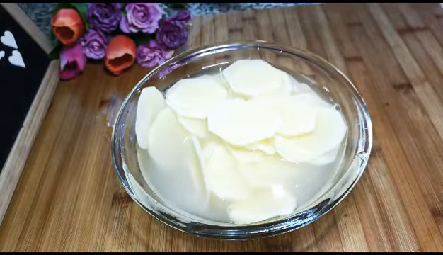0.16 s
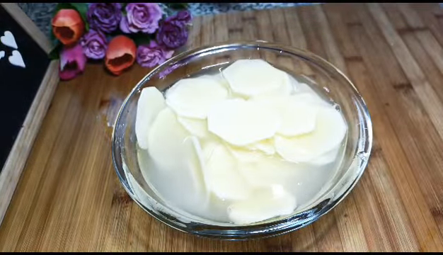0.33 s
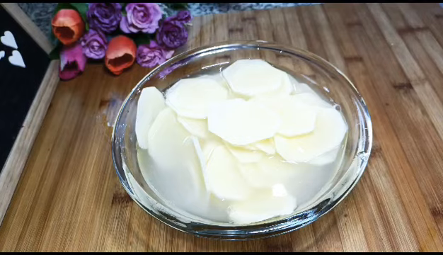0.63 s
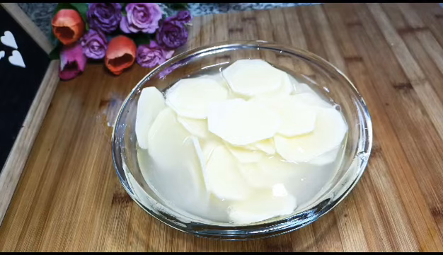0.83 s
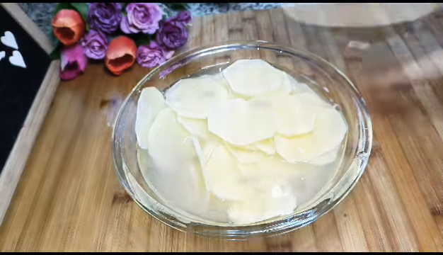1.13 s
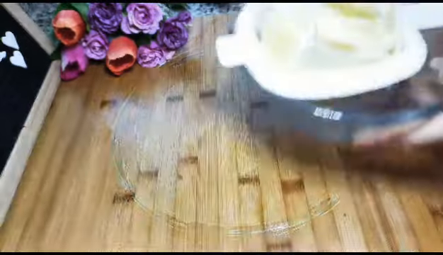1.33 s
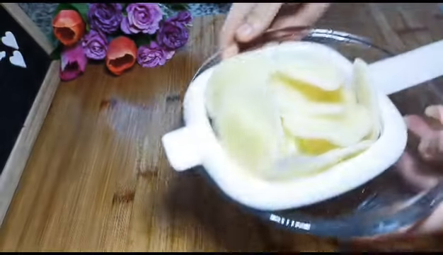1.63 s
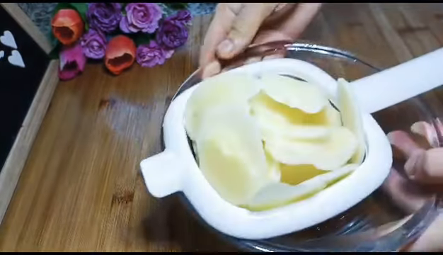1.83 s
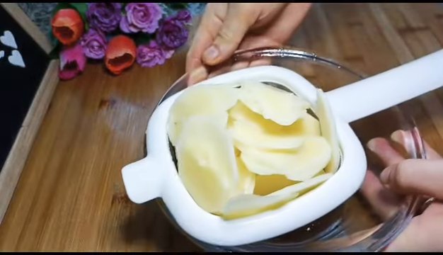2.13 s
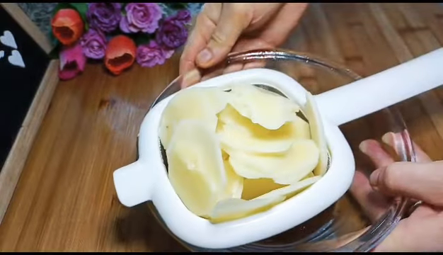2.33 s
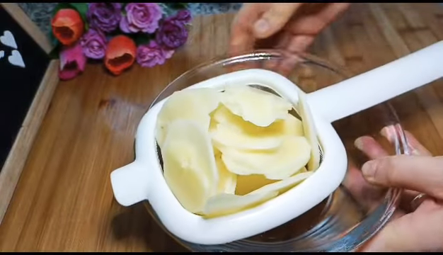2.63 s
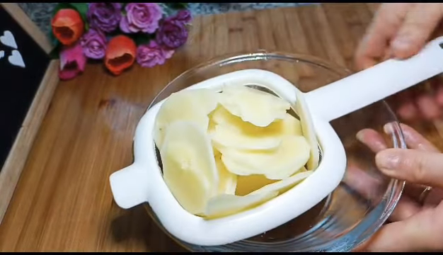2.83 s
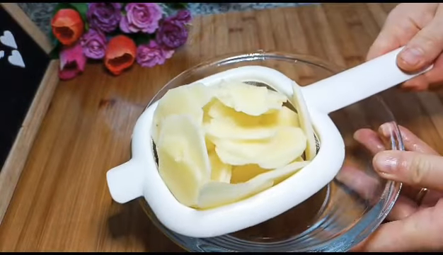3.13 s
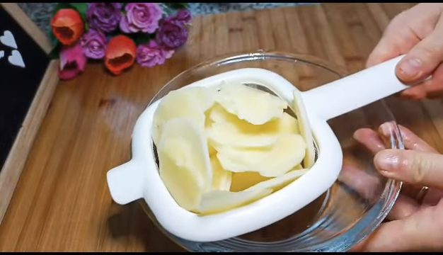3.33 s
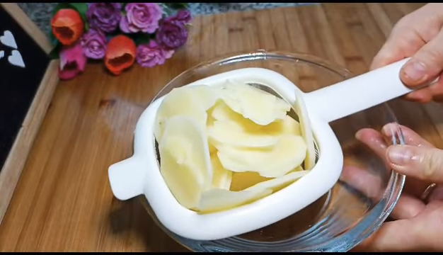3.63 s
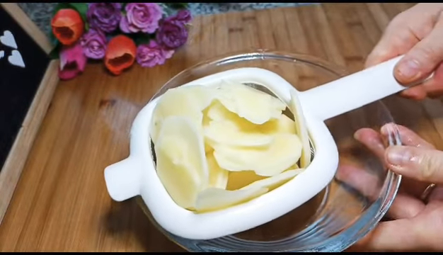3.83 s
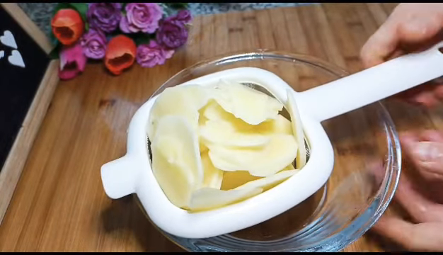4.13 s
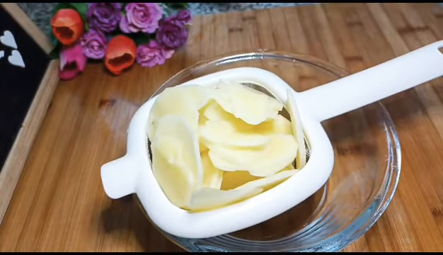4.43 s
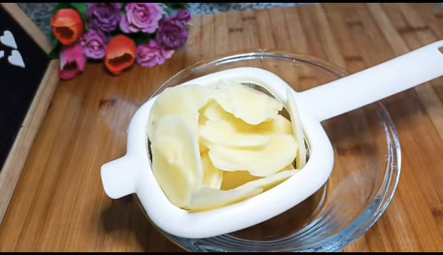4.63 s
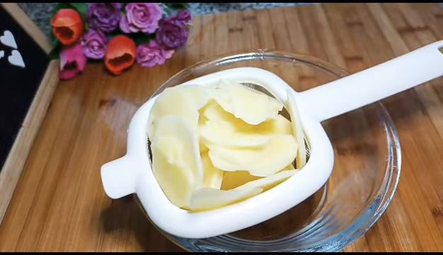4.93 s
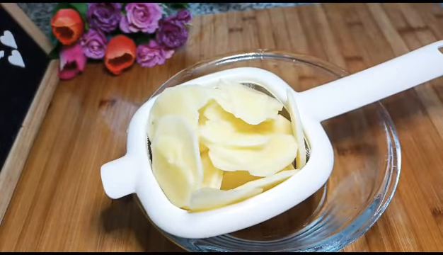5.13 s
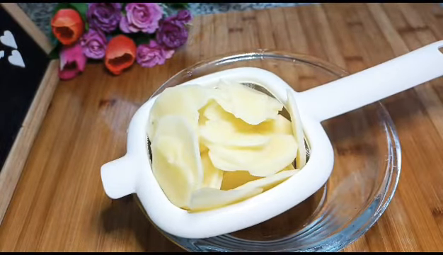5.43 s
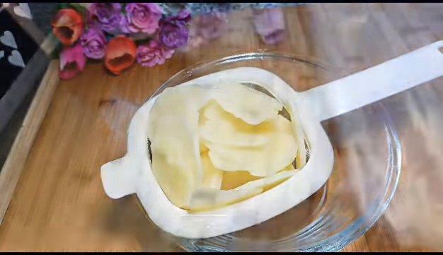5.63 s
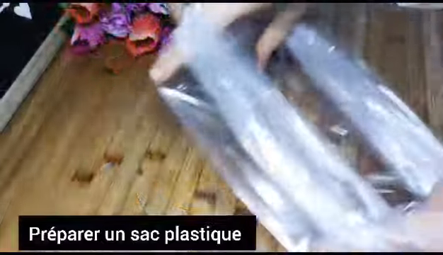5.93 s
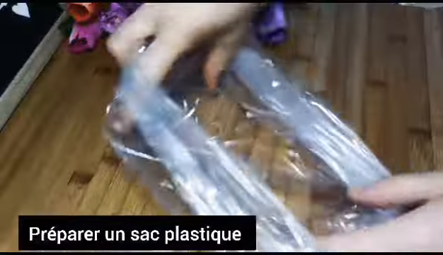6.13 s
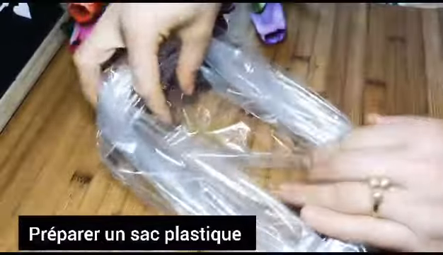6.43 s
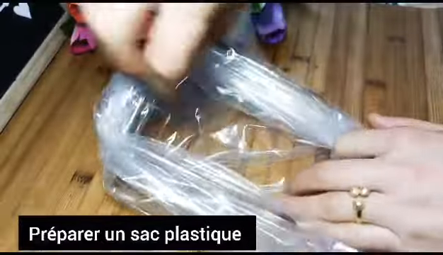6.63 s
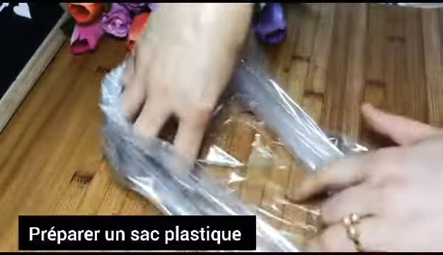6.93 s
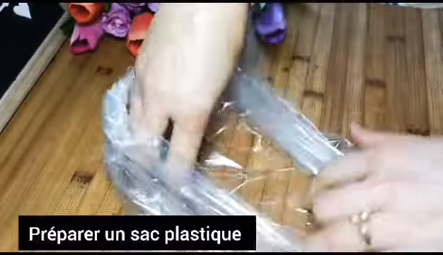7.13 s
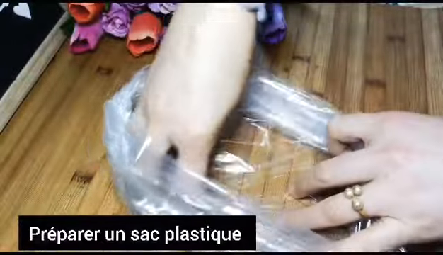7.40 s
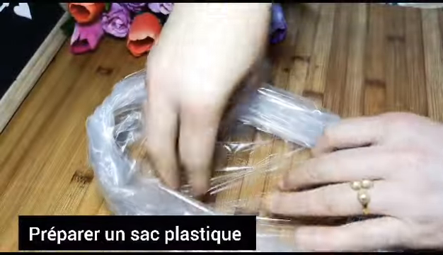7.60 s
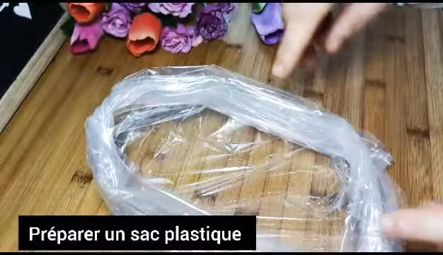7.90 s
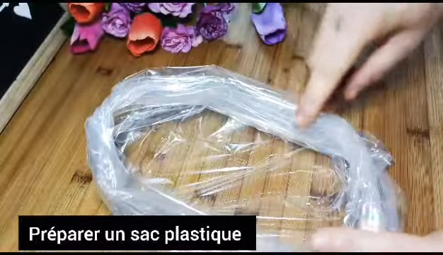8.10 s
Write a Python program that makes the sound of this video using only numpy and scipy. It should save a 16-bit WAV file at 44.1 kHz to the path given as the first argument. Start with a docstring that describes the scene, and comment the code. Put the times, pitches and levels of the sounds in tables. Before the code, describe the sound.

Close stereo pickup in a quiet kitchen with a faint low hum. A few soft rustles and dry ticks come first, then a solid knock on a wooden table. A plastic strainer clacks and clinks against a glass bowl. A bird chirps outside with short echoes, and finally a thin plastic bag is shaken open, crinkling and snapping brightly in uneven bursts.

```python
"""Sleeves rustle and dry ticks sound first, close to a two-port microphone in a quiet kitchen; then a wooden table
is knocked. A glass bowl goes down and a plastic strainer clinks on its rim: struck modes ring under cracks of noise.
A songbird outside whistles in gliding sines with echoes. A thin plastic bag is then shaken open and crinkles in
random clicks, low flaps and sharp snaps. An appliance hums under it all: shaped noise and a wavering deep tone."""
import sys
import numpy as np
from scipy import signal
from scipy.fft import rfft, irfft
from scipy.io import wavfile
from scipy.ndimage import uniform_filter1d

SR = 44100
rng = np.random.default_rng(int(sys.argv[2]) if len(sys.argv) > 2 else 0)


def unload_wav(signal):
    """Save mono or channel-first audio to the path in sys.argv[1] as 16-bit WAV at rate SR, clipped to [-1, 1]."""
    wavfile.write(
        sys.argv[1],
        SR,
        np.round(np.clip(np.atleast_2d(signal).T, -1, 1) * 32767).astype(np.int16),
    )


N = 364248
T = np.arange(N) / SR  # seconds

# All levels in dB are drive levels: the filters and gains further on shift them.
# Knocks on the table. Each row: start in seconds, level in dB, brightness in dB, sway of the frame in dB.
THUDS = [(0.206, -54.5, -19, -73), (2.296, -24, -6, -43), (2.573, -41.5, -24, -54.5),
         (3.082, -45.5, -29, -70), (3.302, -40.5, -22, -49.5), (3.54, -41.5, -12, -42.5),
         (3.593, -50, -18, -52), (5.9, -38, -34, -55.5)]
# Ringing modes of the table boards. Each row: frequency in Hz, level in dB, 60 dB decay in seconds.
BOARD_MODES = [(203, -13.5, 0.096), (292, -13, 0.14), (355.7, 0.5, 0.071), (390.4, -0.5, 0.099),
               (424.7, -5.5, 0.21), (519, -9.5, 0.11), (616, -9, 0.11), (690, -5.5, 0.22)]
# Slow mode of the table frame. Each row: frequency in Hz, level in dB, 60 dB decay in seconds.
FRAME_MODES = [(104, 3, .2)]
CONTACT_MS, SOFTER_MS_PER_DB = 1.6, .03  # a duller knock presses longer
BOARDS_DB, BOOM_DB = -7, -14  # ring of the boards and low boom, against the blow
BOOM_RISE_S = 0.0074

# Strainer against the rim. Each row: start in seconds, level in dB, crack in dB, share of long glass ring in dB,
# tilt of that ring in dB per octave.
CLINKS = [(2.93, -81, -26, 12, 1), (2.945, -79.5, -28, 18, 0.5), (3.1742, -70.5, -14, 4.5, -19),
          (3.3049, -30, -6, -14.5, -16), (3.3154, -39, -31, -7, -7), (3.364, -45, -9, -12, 9.5),
          (3.404, -69, -31, 16, -4), (3.4594, -72.5, -21, 12, 3), (3.5406, -29.5, -2.5, -5, -4),
          (3.592, -65, -30, 9, -17), (3.5997, -37, -20, -10, 7), (3.673, -57, -26, 9.5, -7),
          (3.6824, -37, -13.5, -27, 0), (3.7787, -70, 7, -12, -6), (3.8155, -47, -11, -10, -12),
          (3.8496, -65.5, -29, 10, -15), (4.1107, -51, -34, -21, -11), (4.2086, -66.5, -10, 0.5, -12)]
# Ringing modes of the glass bowl. Each row: frequency in Hz, level in dB, 60 dB decay in seconds.
GLASS_MODES = [(985, -17, .08), (1010, -14, .15), (2240, -2, .15), (2290, -4, .11), (3840, -14, .11),
               (5800, -19, .11), (8060, -27, .08)]
# Short modes of the plastic strainer. Each row: frequency in Hz, level in dB, 60 dB decay in seconds.
STRAINER_MODES = [(1588, -15.5, 0.036), (1860, -20, 0.078), (2180, 6.5, 0.028), (3100, -6.5, 0.027),
                  (4470, 8.5, 0.012), (5240, 3, 0.031), (7200, -26.5, 0.0404)]
CRACK_DB, CLACK_DB = 12, -3.5  # gain of the crack and of the strainer's clack
HARD_DB, DULLING = -26, 1.2  # softer clinks lose treble: dB per octave for each dB under a hard one

# Tugs at the bag. Each row: start in seconds, hold in seconds, level in dB.
TUGS = [(5.48, 0.12, -53), (5.68, 0.077, -48.5), (5.8, 0.018, -39), (5.87, 0.12, -33), (5.915, 0.027, -28),
        (6.0, 0.031, -40.5), (6.09, 0.095, -43.5), (6.26, 0.097, -46.5), (6.5, 0.046, -52.5),
        (6.56, 0.075, -62.5), (6.69, 0.073, -57), (6.84, 0.015, -66.5), (6.9, 0.22, -31.5),
        (6.95, 0.08, -26), (7.18, 0.054, -43.5), (7.285, 0.012, -38.5), (7.4, 0.028, -57.5),
        (7.44, 0.11, -34.5), (7.66, 0.093, -64)]
TUG_RISE_DB_PER_S, TUG_FALL_DB_PER_S = 318.5, 423.5
# The bag is shaken open and the film flaps more: start in seconds, hold in seconds,
# level in dB of the flapping added in power to a steady 0 dB.
SHAKE = (5.86, 0.21, 3.6)
# Single folds that snap. Each row: start in seconds, level in dB, treble in dB against that level.
SNAPS = [(5.787, -30, 4.5), (5.8049, -32, -1), (5.847, -34, -13), (5.9755, -31.5, -7), (6.0764, -36.5, 4),
         (6.136, -53, 17.5), (6.172, -39, 4.5), (6.2288, -34, -6.5), (6.265, -36, -2), (6.327, -39.5, 8.5),
         (6.388, -44.5, -3), (6.437, -43.5, -27), (6.4606, -44.5, -3), (6.49, -48, 2), (6.6707, -49.5, 7.5),
         (6.6998, -40.5, 5), (6.817, -43, -9), (6.8276, -36, -2), (6.854, -48, -3), (6.861, -51, 0),
         (6.893, -32, -3), (6.8998, -25, -0.5), (6.9712, -18.5, -1.5), (7.071, -18.5, -7), (7.081, -27, 0),
         (7.093, -23, -0.5), (7.1214, -26.5, 6), (7.1418, -22, -2.5), (7.2808, -31, -13), (7.29, -27, -27),
         (7.3094, -47, 8), (7.39, -43, -15), (7.4064, -33, -15), (7.435, -30.5, -4), (7.456, -43, -3),
         (7.472, -24.5, -0.5), (7.4883, -20, -2), (7.5449, -25.5, 2.5), (7.5636, -22.5, 0.5),
         (7.636, -36.5, -25), (7.757, -50.5, -6.5), (7.8876, -57, -27.5)]
SNAP_MID_DB, SNAP_TREBLE_DB = 2.5, 1.5
# Colour of the crackling film. Each row: frequency in Hz, relative response in dB.
FILM_COLOUR = [(530, -40), (900, -5.5), (1630, -8.5), (2280, 0.5), (2700, -8.5), (3040, -2), (4050, -4),
               (6610, -1), (8000, -6.5), (15600, 2)]
# Colour of the loose film flapping. Each row: frequency in Hz, relative response in dB.
FLAP_COLOUR = [(24, -46.5), (40, -19), (92, -22), (150, -15), (270, -2), (460, -5.5), (1500, -13.5),
               (1950, -30.5), (3300, -120)]
BRIGHTER = 0.085  # harder tugs crackle brighter: dB per octave for each dB

# Sleeves moving. Each row: start in seconds, hold in seconds, level in dB.
RUSTLES = [(0, 0.027, -61.5), (.2, 0.15, -74.5), (.705, 0.0079, -59.5), (.77, 0.0066, -57.5),
           (4.17, 0.34, -67.5), (4.6, 0.071, -68), (8.25, 0.032, -62.5)]
RUSTLE_RISE_DB_PER_S, RUSTLE_FALL_DB_PER_S = 302, 300

# Dry ticks in the room. Each row: start in seconds, level in dB, centre in Hz, 60 dB decay in seconds,
# left minus right in dB, overtone in dB.
TICKS = [(0.211, -43, 910, 0.15, 2, -33), (0.696, -56.5, 2150, 0.24, 9, 0.5),
         (0.769, -54, 2450, 0.35, 3, 0), (0.9362, -34.5, 1890, 0.2, 2.5, -20)]
OVERTONE_RATIO, TICK_TREBLE_DB = 1.9, -29  # pitch ratio; level of the wide bright tail

# Bird chips, a quick fall onto a held pitch. Each row: start in seconds, held pitch in Hz,
# haste of the fall (no unit), level in dB.
CHIPS = [(4.344, 3850, 10, -60.5), (4.431, 3770, 7.9, -64), (4.522, 3794, 6.5, -59.5),
         (4.613, 3824, 11.8, -57.5), (4.7, 3580, 7.8, -59), (4.782, 3525, 4.9, -56.5),
         (5.108, 3630, 4.7, -60), (5.385, 3430, 2.4, -57.5)]
CHIP_S, CHIP_TOP_HZ = 0.062, 5550
# Downward slurs, each followed by a fading trill. Each row: start in seconds, length in seconds, level in dB,
# trill length in seconds.
SLURS = [(4.885, .026, -56, .02), (5.165, .04, -52, .085), (5.454, .036, -52, .06)]
SLUR_TOP_HZ, CHEST_HZ, SLUR_HASTE = 3350, 2050, -1.2  # negative haste: slow at first
TRILL_GAP_S, TRILL_NOTE_S, TRILL_PERIOD_S, TRILL_TOP_HZ = .012, .016, .022, 2700
TRILL_DB, TRILL_FADE_DB = -12.5, -2.5  # against the slur; change with each note
# Plain whistles. Each row: start in seconds, length in seconds, start pitch in Hz, end pitch in Hz, level in dB.
WHISTLES = [(1.096, 0.1, 3970, 4050, -86), (4.937, 0.025, 2026, 3580, -65), (5.627, 0.027, 2920, 2780, -64),
            (5.654, .045, 2780, 3660, -55), (5.701, 0.027, 3650, 3670, -51),
            (5.732, 0.0465, 3140, 3504, -53), (7.679, 0.072, 2713, 2674, -64.5),
            (7.797, 0.037, 2740, 2520, -72.5)]
WHISTLE_HASTE = 0.93
# Buzz. Each row: start in seconds, length in seconds, centre in Hz, swing in Hz, mean warble rate in Hz,
# level in dB.
BUZZ = [(4.134, 0.27, 5010, 584, 153.7, -68.5)]
HIGH_LOSS_DB_PER_OCT = -6
HOARSE, ECHO_S, ECHO_DB, DIRECT_DB = .35, .012, -3, 1  # rasp of the voice; a wall near the bird

# Colour of the room tone. Each row: frequency in Hz, relative response in dB.
ROOM_TONE = [(15, -74), (25, -23.5), (70, -21.5), (96, -8.5), (179, -24), (275, -9), (1350, -30),
             (3470, -36), (3860, -30.5), (6630, -36), (7180, -45.5), (11000, -37), (15700, -40)]
ROOM_TONE_DB = -70
# Likeness of the two ports. Each row: frequency in Hz, left-right correlation (no unit).
LIKENESS = [(60, 0.96), (300, 0.57), (1400, 0.015)]
# Humming bands. Each row: centre in Hz, width at half amplitude in Hz, level in dB.
HUM_BANDS = [(270.3, 56, -76), (3350, 250, -90), (6940, 360, -94.5)]
# Course of the deep tone. Each row: time in seconds, level in dB.
DEEP_TONE = [(0, -74), (1.1, -73), (1.3, -99), (1.5, -71.5), (5.7, -74), (5.8, -78), (8.26, -90.5)]
DEEP_HZ = 109.7
# Decay of the kitchen before each use scales it. Each row: frequency in Hz, 60 dB decay in seconds.
ROOM_T60 = [(200, 1), (2000, 0.74), (10000, 0.54)]
TOP_HZ = 15900  # upper edge of the sound


def knocked_table():
    """Each push rings the boards, duller the longer the contact; brighter blows add more woody knock."""
    push = np.zeros((2, N))
    for s, db, bright_db, _ in THUDS:
        contact_ms = CONTACT_MS - SOFTER_MS_PER_DB * bright_db
        shape = np.hanning(int(max(contact_ms, .2) * SR / 1000) + 2)
        start = int(s * SR)
        push[:, start:start + len(shape)] += undb(db + BOARDS_DB) * 2 * shape / shape.sum()
    s, db, bright_db, sway_db = np.transpose(THUDS)

    hit = blows(s, db + bright_db, 1.3 + 0 * s)
    knock = (undb(14.5) * fade(hit, 0.026) + undb(1.5) * fade(hit, 0.16)) * noise()
    knock = lowpass(band(knock, 500, 2100), 5, 1800)

    decay = fade(blows(s, db + BOOM_DB, 1.5 + 0 * s), 0.25)
    rise = int(BOOM_RISE_S * SR)
    boom = signal.lfilter(np.ones(rise) / rise, [1], decay) * narrow_noise(noise(), 0.27)

    boards = ring(push, BOARD_MODES) + knock + band(boom, 180, 450)
    sway = band(ring(blows(s, sway_db, -3 + 0 * s), FRAME_MODES), 80, 110)
    return band(band(boards, 150, 6000), 77, 9000) + sway


def bowl():
    """Plastic on glass: a crack, the strainer's short clack and the long ring of the bowl."""
    s, db, crack_db, ring_db, ring_tilt_db = np.transpose(CLINKS)
    pan_db = 0.5 + 2 * rng.standard_normal(len(s))
    crack = fade(blows(s, db + crack_db + CRACK_DB, pan_db), 0.018) * noise()
    crack = band(crack, 2700, 12000)

    glass = 0
    for mode in GLASS_MODES:
        hit_db = db + ring_db + ring_tilt_db * np.log2(mode[0] / 1600)
        # each glass mode wavers in level at random
        glass = glass + ring(blows(s, hit_db, pan_db), [mode]) * undb(4.5 * walk(70))

    tilt_db = DULLING * np.minimum(db - HARD_DB, 0)
    clack = 0
    for mode in STRAINER_MODES:
        hit_db = db + CLACK_DB + tilt_db * np.log2(mode[0] / 2000)
        clack = clack + ring(blows(s, hit_db, pan_db), [mode])
    return crack + clack + glass


def bag():
    """Creases buckle in dense random clicks of very unequal size; loose film flaps low; big folds snap."""
    db = swells(TUGS, TUG_RISE_DB_PER_S, TUG_FALL_DB_PER_S)
    tugged = undb(db + np.array([[.8], [-.8]]))
    flap_db = -23 + swells([(0, N / SR, 0), SHAKE], TUG_RISE_DB_PER_S, TUG_FALL_DB_PER_S)
    flap = level(colour(narrow_noise(noise() * undb(2.6 * walk(40)), 0.18), FLAP_COLOUR), 0)
    return tugged * (crackle(db) + undb(flap_db) * flap) + snaps()


def crackle(tug_db):
    """Buckling creases: about 650 clicks a second, each with its own size, side and colour."""
    chance = rng.random((int(650 * N / SR), 3)).T
    when = chance[0] * N / SR
    size_db = -6 * np.log(1 - chance[1])
    side_db = 8 * (chance[2] - .5)
    tug_then_db = tug_db[(when * SR).astype(int)]
    # the largest clicks are capped, lower in hard tugs
    size_db = np.minimum(size_db, np.interp(tug_then_db, [-51, -31], [13, 7]))
    clicks = 0
    for lo_hz, hi_hz in ((700, 2500), (2500, 5500), (5500, 10000), (10000, 20000)):
        tint_db = 3.6 * rng.standard_normal(len(when))
        tint_db = tint_db + BRIGHTER * (tug_then_db + 35.5) * np.log2(lo_hz / 2500)
        burst = fade(blows(when, size_db + tint_db, side_db), .006) * noise()
        clicks = clicks + band(burst, lo_hz, hi_hz)
    return level(colour(clicks, FILM_COLOUR), 0)


def snaps():
    """Big folds flip over: short noise bursts in the mids and in the treble."""
    s, db, treble_db = np.transpose(SNAPS)
    side_db = 0.5 + 3 * rng.standard_normal(len(s))
    mids = fade(blows(s, db + SNAP_MID_DB, side_db), 0.015) * noise()
    treble = fade(blows(s, db + treble_db + SNAP_TREBLE_DB, side_db), 0.021) * noise()
    return band(mids, 1860, 8100) + band(treble, 8000, 20000)


def rustle():
    """Fibres of the sleeves slide: a fluttering, wide hiss."""
    grain = noise() * undb(0.87 * walk(66))
    treble = signal.sosfilt(signal.butter(2, 7500, "high", fs=SR, output="sos"), grain)
    hiss = level(treble, 0.6) + level(band(grain, 2560, 9150), -3.5)
    return undb(swells(RUSTLES, RUSTLE_RISE_DB_PER_S, RUSTLE_FALL_DB_PER_S)) * hiss


def ticks():
    """Each tick is a click with a noisy tail round its own centre, an overtone and a wide bright tail."""
    out = 0
    for s, db, hz, t60, pan_db, over_db in TICKS:
        hit = blows([s], db, [pan_db])
        click = band(fade(hit, 0.004) * noise(), hz / 2, hz * 2)
        body = band(band(fade(hit, t60) * noise(), hz / 1.5, hz * 1.3), hz / 6.4, hz * 4.7)
        tail = fade(hit, t60) * noise()
        over_hz = hz * OVERTONE_RATIO
        overtone = undb(over_db) * band(tail, over_hz / 1.12, over_hz * 1.4)
        out = out + click + body + overtone + undb(TICK_TREBLE_DB) * band(tail, 3000, 14000)
    return out


def bird():
    """A voice of gliding sines and a warbling buzz, roughened, with a wall echo and a diffuse tail."""
    x = np.zeros(N)
    wobble = uniform_filter1d(rng.standard_normal(N), 40) * 40 ** .5
    for s, length, hz0, hz1, haste, db, shape in notes():
        u = np.arange(int(length * SR)) / (length * SR)
        at = slice(int(s * SR), int(s * SR) + len(u))
        glide = (np.exp(-haste * u) - np.exp(-haste)) / (1 - np.exp(-haste))
        hz = hz1 * (hz0 / hz1) ** glide
        hz = hz * (1 + (.008 + .16 * np.maximum(np.log2(hz / 3900), 0)) * wobble[at])  # hoarser at the top
        # the highest pitches carry least
        loss_db = HIGH_LOSS_DB_PER_OCT * np.maximum(np.log2(hz / 4000), 0)
        swell = np.sin(np.pi * u ** shape) * undb(loss_db)
        x[at] += undb(db) * swell * tone(hz)
    for s, length, centre_hz, swing_hz, warble_hz, db in BUZZ:
        u = np.arange(int(length * SR)) / (length * SR)
        hz = centre_hz + swing_hz * tone(warble_hz * (1 + .35 * walk(150)[:len(u)]))
        x[int(s * SR):int(s * SR) + len(u)] += undb(db) * np.sin(np.pi * u) ** 0.24 * tone(hz)
    x = x * (1 + HOARSE * walk(900)) * undb(2.2 * walk(250)) * undb([[1.5], [-1.5]])
    near = x + undb(ECHO_DB) * np.roll(x, int(ECHO_S * SR), axis=1)
    return undb(DIRECT_DB) * near + room(band(x, 2300, 6000), 3.5, .004, 1.15)


def notes():
    """The song as rows: start s, length s, start Hz, end Hz, haste of the glide, dB, shape of the swell."""
    rows = [(s, CHIP_S, CHIP_TOP_HZ, hz, haste, db, .55) for s, hz, haste, db in CHIPS]
    rows += [(s, length, hz0, hz1, WHISTLE_HASTE, db, .75) for s, length, hz0, hz1, db in WHISTLES]
    for s, length, db, trill_s in SLURS:
        rows.append((s, length, SLUR_TOP_HZ, CHEST_HZ, SLUR_HASTE, db, .35))
        for k, late in enumerate(np.arange(0, trill_s, TRILL_PERIOD_S)):
            start = s + length + TRILL_GAP_S + late
            note_db = db + TRILL_DB + k * TRILL_FADE_DB
            rows.append((start, TRILL_NOTE_S, TRILL_TOP_HZ, CHEST_HZ, WHISTLE_HASTE, note_db, .75))
    return rows


def hum():
    """Room tone and appliance hum, most alike on both ports in the bass, with a wavering deep tone."""
    hz = np.fft.rfftfreq(N, 1 / SR)
    like = np.clip(at_hz(LIKENESS, hz), 0, .98)
    mid, side = rfft(noise(), axis=1)
    both = mid * np.sqrt(1 + like) + side * np.sqrt(1 - like) * np.array([[1], [-1]])
    out = level(irfft(both * undb(at_hz(ROOM_TONE, hz)), N), ROOM_TONE_DB) * undb(.5 * walk(4.9))
    for centre_hz, width_hz, db in HUM_BANDS:
        out = out + level(irfft(both / (1 + (2 * (hz - centre_hz) / width_hz) ** 2), N), db)
    deep = tone(DEEP_HZ + 3.5 * walk(9)) * undb(1.5 * walk(14))
    deep_db = np.interp(T, *np.transpose(DEEP_TONE)) + np.array([[-1.5], [1.5]])
    return out + deep * undb(deep_db)


def room(x, wet_db, predelay_s, slow):
    """Diffuse tail whose treble dies first; unrelated left and right."""
    t = T[:SR * 3 // 4]
    tail = 0
    for hz in 62.5 * 2. ** np.arange(9):
        octave = band(rng.standard_normal((2, len(t))), hz / 2 ** .5, hz * 2 ** .5)
        tail = tail + octave * 1000 ** (-t / (slow * at_hz(ROOM_T60, hz)))
    tail = tail * (t > predelay_s)
    tail = tail / np.sqrt(np.sum(tail ** 2) / 2)
    return undb(wet_db) * signal.oaconvolve(x, tail, axes=1)[:, :N]


def blows(s, db, pan_db):
    """Stereo impulses at the given times; pan is left minus right."""
    x = np.zeros((2, N))
    at = np.minimum(np.asarray(s) * SR, N - 1).astype(int)
    np.add.at(x, (np.array([[0], [1]]), at), undb(db + np.outer([.5, -.5], pan_db)))
    return x


def fade(x, t60):
    """Every impulse becomes an exponential decay."""
    return signal.lfilter([1], [1, -1000 ** (-1 / (max(t60, 1e-4) * SR))], x)


def ring(x, modes):
    """Sum of decaying modes; each reaches the two ports with its own phase."""
    t = T[:int(1.2 * max(mode[2] for mode in modes) * SR)]
    response = 0
    for hz, db, t60 in modes:
        phase = min(hz / 1500, 1.2) * rng.uniform(-1, 1, (2, 1))
        response = response + undb(db) * 1000 ** (-t / t60) * np.sin(2 * np.pi * hz * t + phase)
    return signal.oaconvolve(x, response, axes=1)[:, :N]


def swells(rows, rise_db_per_s, fall_db_per_s):
    """Level in dB of overlapping gestures, each a steady rise, a hold and a steady fall, summed in power."""
    s, hold, db = np.transpose(rows)[:, :, None]
    t = T[::32]
    db = db - rise_db_per_s * np.maximum(s - t, 0) - fall_db_per_s * np.maximum(t - s - hold, 0)
    return np.interp(T, t, 10 * np.log10(np.sum(undb(2 * db), axis=0) + 1e-14))


def walk(rate):
    """Random levels drawn at the given rate in Hz and slewed from one to the next; spread near 1."""
    k = int(SR / rate)
    return 1.2 * uniform_filter1d(np.repeat(rng.standard_normal(N // k + 1), k), k)[:N]


def noise():
    """White noise, unrelated left and right."""
    return rng.standard_normal((2, N))


def narrow_noise(pair, width):
    """Middle signal plus a little side signal of opposite sign on the two ports."""
    mid, side = pair
    return mid + width * side * np.array([[1], [-1]])


def tone(hz):
    """Sine that follows a pitch curve."""
    return np.sin(2 * np.pi * np.cumsum(hz) / SR)


def band(x, lo_hz, hi_hz):
    """Gentle band-pass."""
    return signal.sosfilt(signal.butter(2, [lo_hz, min(hi_hz, SR / 2.1)], "band", fs=SR, output="sos"), x)


def lowpass(x, order, hz):
    """Low-pass of the given order."""
    return signal.sosfilt(signal.butter(order, hz, fs=SR, output="sos"), x)


def colour(x, table):
    """Causal filter with the given (Hz, dB) response, from the folded cepstrum."""
    c = irfft(at_hz(table, np.fft.rfftfreq(8192, 1 / SR)) * np.log(10) / 20)
    c[1:4096] = 2 * c[1:4096]
    c[4097:] = 0
    return signal.oaconvolve(x, irfft(np.exp(rfft(c)))[None], axes=1)[:, :N]


def at_hz(table, hz):
    """Read a (Hz, value) table on a log-frequency axis."""
    f, v = np.transpose(table)
    return np.interp(np.log(hz + 1), np.log(f), v)


def undb(db):
    """Amplitude factor of a level in dB."""
    return 10 ** (np.asarray(db) / 20)


def level(x, db):
    """Scale to the given RMS level."""
    return x * undb(db) / np.sqrt(np.mean(x ** 2))


def scene():
    """Everything in the kitchen with its short reverberation, then the bird outside and the hum."""
    near = knocked_table() + bowl() + bag() + rustle() + ticks()
    return near + room(band(near, 150, 22000), -4.5, 0.0022, 0.28) + bird() + hum()


def record(dry):
    """The microphone ports ring a little in the treble; a steep low-pass ends the treble."""
    ports = dry + undb(-2.5) * band(dry, 6460, 6860)
    return signal.sosfilt(signal.ellip(10, .3, 80, TOP_HZ, fs=SR, output="sos"), ports)


dry = scene()
out = record(dry)
unload_wav(out)
```